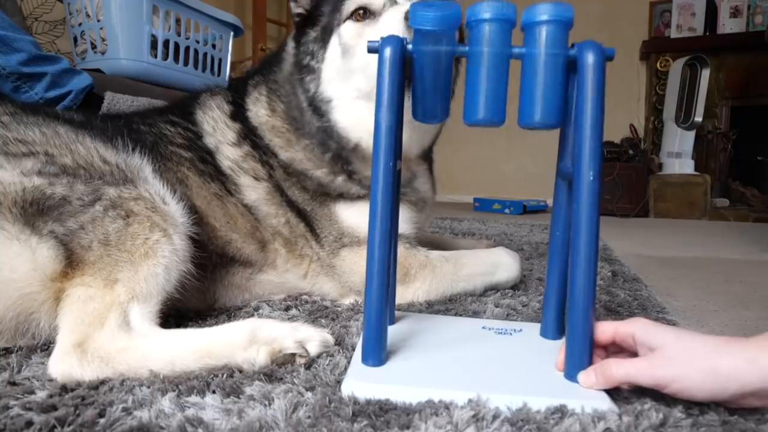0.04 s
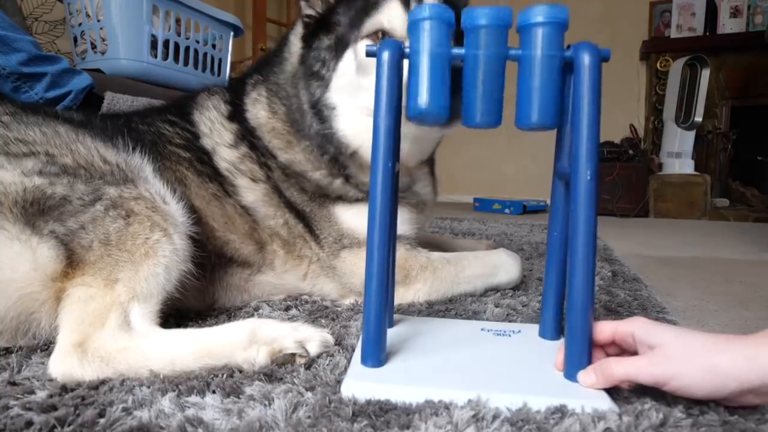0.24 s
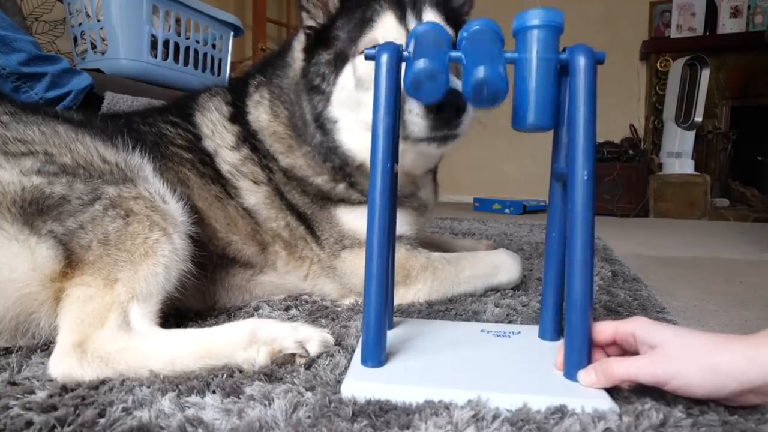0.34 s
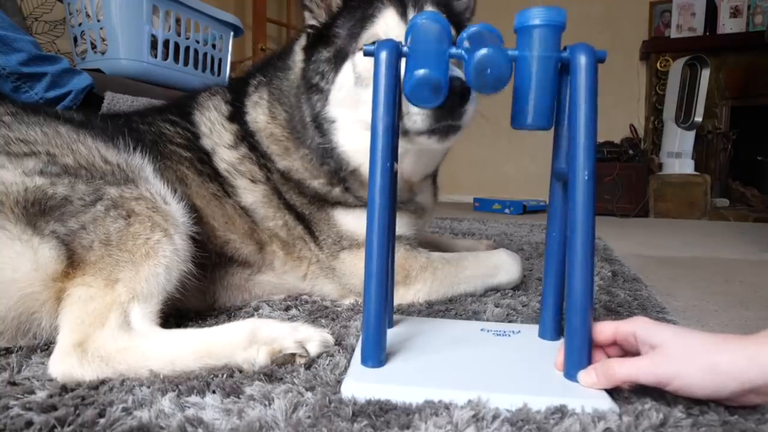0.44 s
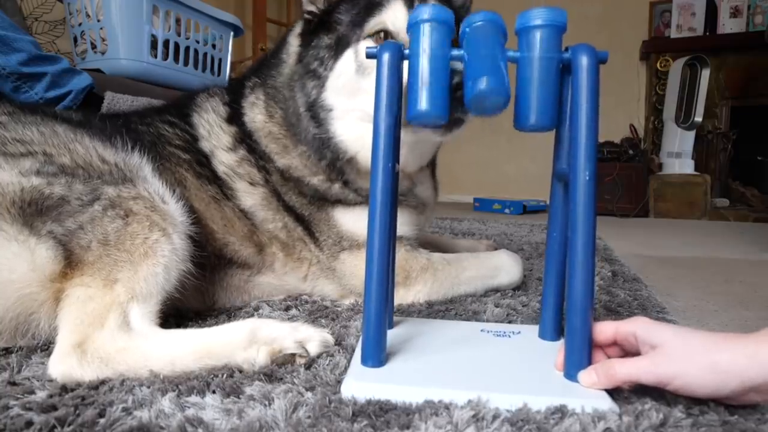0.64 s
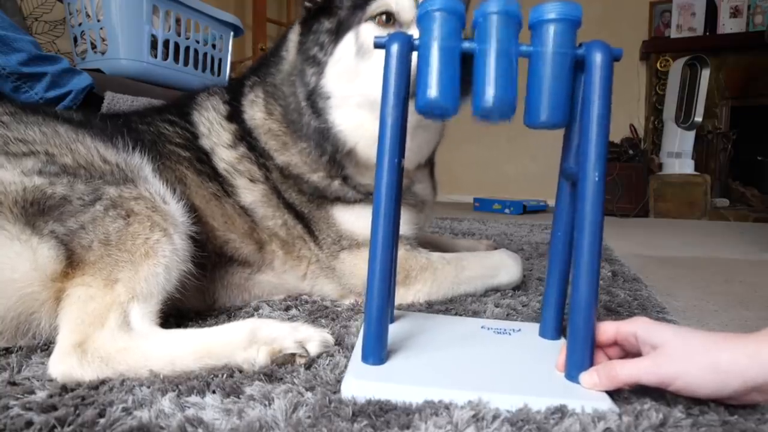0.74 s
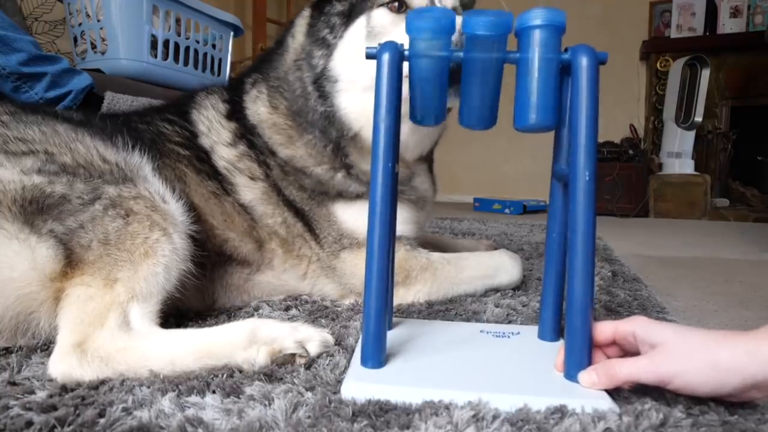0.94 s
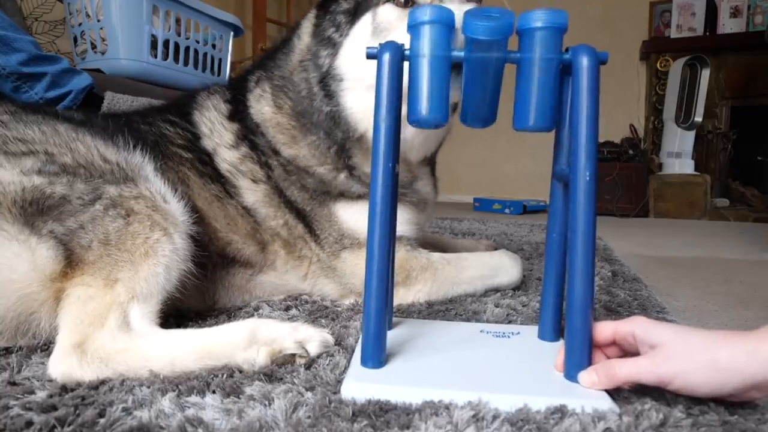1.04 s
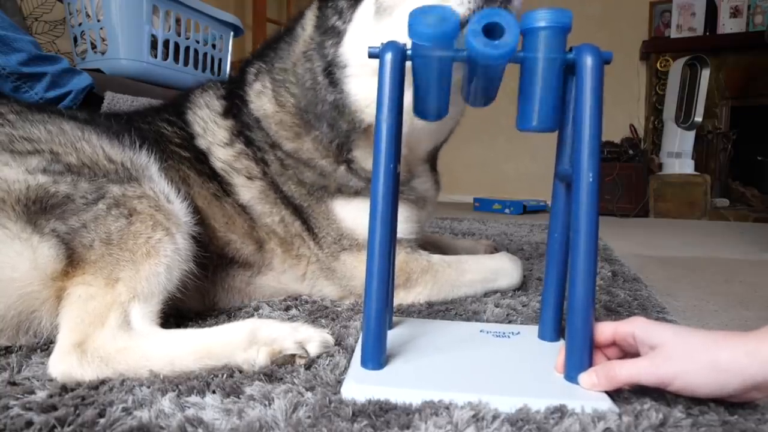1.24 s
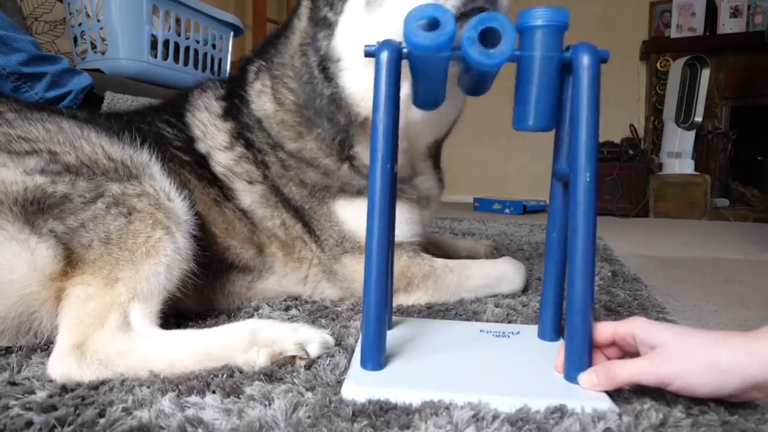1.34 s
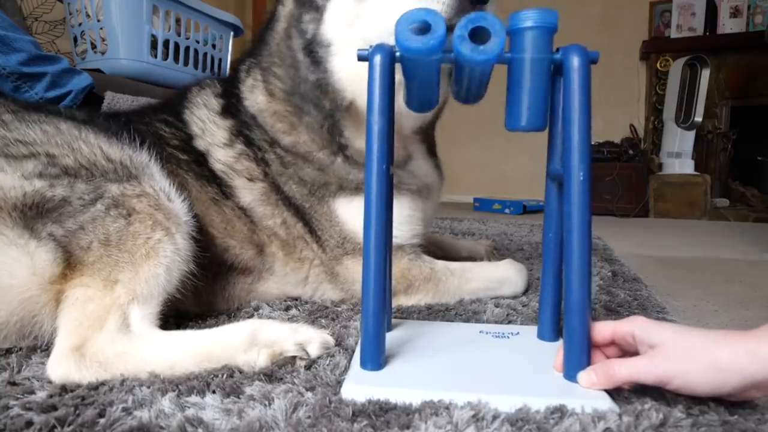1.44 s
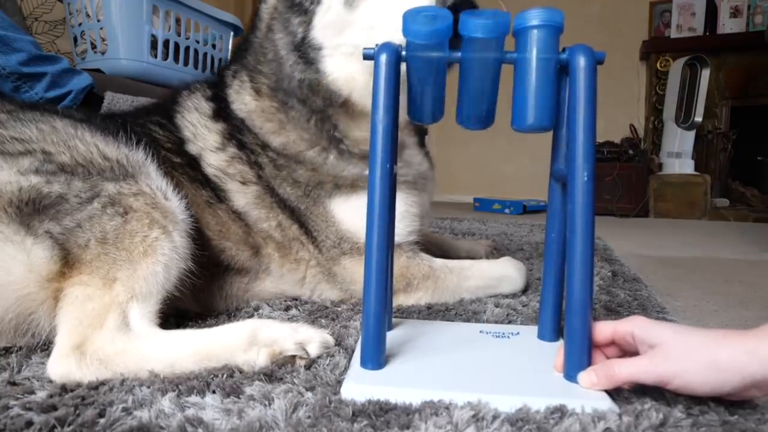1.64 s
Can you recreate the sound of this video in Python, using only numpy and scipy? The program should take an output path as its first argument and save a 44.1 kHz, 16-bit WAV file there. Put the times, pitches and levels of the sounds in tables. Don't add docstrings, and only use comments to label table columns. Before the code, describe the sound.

Hollow plastic cups knock and rattle on a bar, dry treats ticking inside, in a carpeted room

```python
import sys
import numpy as np
from scipy import signal
from scipy.fft import rfft, irfft
from scipy.io import wavfile

SR = 44100
rng = np.random.default_rng(int(sys.argv[2]) if len(sys.argv) > 2 else 0)


def inscribe(sig):
    pcm = np.round(np.clip(np.atleast_2d(sig).T, -1, 1) * 32767)
    wavfile.write(sys.argv[1], SR, pcm.astype(np.int16))


def ratio(d):
    e = np.asarray(d, float) / 20
    return 10 ** e


N = 74970

# start_s, peak_db, pitch_hz
FRAME_THUMPS = [(0.225, -49, 217), (.244, -27.5, 199), (0.306, -36.5, 238), (.345, -32, 475),
                (0.453, -20, 210), (.456, -27, 434), (0.566, -35, 330), (0.675, -32.5, 213),
                (0.736, -26.5, 440), (.858, -25.5, 208), (.8885, -19.5, 510), (.896, -24.5, 442),
                (1.096, -37, 552), (1.264, -30.5, 466), (1.3, -30, 274), (1.302, -35, 430),
                (1.59, -56, 239)]
# time_s, level_db
TURNING = [(0, -46.5), (0.096, -60.5), (0.194, -55), (0.217, -44), (.4, -45.5), (.53, -49.5), (.65, -53.5),
           (.76, -43.5), (.95, -50), (1.05, -51), (1.241, -58.5), (1.298, -46.5), (1.479, -52),
           (1.598, -43.5), (1.7, -49)]
# freq_hz, density_db_per_hz
RUB_SPECTRUM = [(35, -59), (60, -27), (217, 8), (380, -11), (715, 6.5), (1110, 0.5), (5590, -5),
                (10000, -9), (13900, -17), (16000, -56)]
# freq_hz, width_hz, level_db
RUB_RINGS = [(201, 270, -19), (390, 330, -15), (800, 100, -37.5), (2170, 160, -51), (3700, 500, -22),
             (6140, 250, -20)]
# start_s, peak_db, top_band_rel_db
TREAT_TICKS = [(0.059, -35, -4.5), (0.271, -29.5, 1), (0.296, -18, -10), (.348, -16, 0), (0.4358, -27.5, 1),
               (.344, -23, -5), (.457, -34, -13), (.479, -43, -13), (.8125, -37, -14), (.835, -27, -5),
               (0.8716, -23, -5), (.8925, -33, -5), (0.912, -26, -3), (1.29, -42, 1), (.045, -32.5, -8),
               (0.682, -46, -4), (0.443, -26, -4), (0.467, -27, -19), (0.503, -36, -17),
               (0.5683, -12, -3.5), (.562, -28, -3), (0.581, -39, -10), (.586, -29, 0), (.605, -27, -9),
               (.514, -50, -15), (.3277, -40, -6), (0.2663, -36, -9), (.659, -39, -7), (.9737, -32, -6),
               (.748, -21, 1), (0.759, -21, -19), (.864, -21, 0), (0.867, -19.5, 0), (0.876, -20, -16),
               (.9035, -26, -15), (.920, -15, -13), (.961, -25.5, 7.5), (1.066, -34.5, -10),
               (1.264, -41.5, 4), (1.33, -12.5, -2.5), (1.34, -25, 2), (1.353, -16, -0.5),
               (1.363, -28, -19), (1.4072, -17.5, -4.5), (1.419, -29, -12), (1.451, -25.5, -4.5)]
# low_hz, high_hz
TICK_BANDS = [(4600, 8610), (7600, 10060), (11000, 14600)]
# start_s, peak_db
RIM_SNAPS = [(.2055, -20), (.2655, -24), (.2715, -13), (.280, -21), (.288, -21), (.4345, -15), (.537, -32),
             (.659, -15), (.7963, -17), (.8718, -2), (.8739, -7), (.948, -24), (.9737, -21), (1.0685, -20)]
# start_s, peak_db, lower_modes_rel_db
CHATTER = [(0.0247, -27, -3), (0.1725, -66.5, 11), (0.2828, -25, -10), (0.327, -25, -33),
           (0.3798, -28, -27), (0.4679, -24.5, -6), (0.5615, -33, -21), (.5682, -16.5, -38),
           (.580, -32, -22), (.586, -38, -25), (.605, -25, -30), (.617, -42, -20), (0.216, -37.5, 7),
           (.249, -38, -14), (0.7459, -18.5, -29), (0.7545, -21, -24), (0.755, -18.5, -16),
           (0.7414, -33, -15), (0.7724, -25, -9), (0.7972, -31, -21), (0.8314, -28, -9),
           (0.8669, -13.5, -1), (0.8764, -19.5, -21), (0.88, -35, -18), (0.9033, -17, -8.5),
           (0.9103, -25, -6), (0.9159, -21, -4), (0.9224, -17, -12), (0.965, -29.5, -8), (1.019, -45, -13),
           (0.9199, -10.5, -19), (0.9314, -26.5, -2), (0.938, -27, -3), (0.9482, -23, 2.5),
           (0.961, -27.5, -2), (0.985, -38, 1), (1.0102, -34, -23), (1.027, -38, -1), (1.0683, -21.5, -8),
           (1.123, -34.5, -2.5), (1.2734, -30, -6.5), (1.5319, -29.5, -6), (1.5683, -32, 3.5)]
# freq_hz, level_db, t60_s
BAR_UPPER = [(5420, -4, 0.009), (5650, -2, 0.008), (5980, -5, 0.006)]
BAR_LOWER = [(3715, -9.5, 0.029), (3796, -7, 0.016)]
# start_s, peak_db
RIM_CLICKS = [(.194, -58), (0.2052, -18), (0.218, -42), (.234, -22), (0.2655, -20), (0.271, -12.5),
              (.280, -15), (0.288, -22.5), (.297, -16), (.3474, -8.5), (.358, -11.5), (0.4344, -12.5),
              (.3335, -33), (.354, -14.5), (.444, -20.5), (.468, -20), (.7455, -26.5), (.7485, -23),
              (0.7552, -21), (.7588, -21), (.7675, -30), (.773, -23), (1.342, -29), (0.933, -26),
              (0.865, -23), (.059, -31), (.485, -30), (0.536, -31), (0.561, -27.5), (0.659, -25),
              (0.7966, -18.5), (.8128, -25), (0.8349, -18.5), (.8718, -14.5), (0.8732, -20), (0.947, -22.5),
              (0.961, -24.5), (.9737, -23.5), (0.993, -35), (1.0686, -25), (1.3296, -20.5), (1.351, -20.5),
              (1.407, -21.5), (1.599, -24.5)]
# freq_hz, level_db, t60_s
RIM_MODES = [(1582, -13.5, 0.015), (2144, -5.5, 0.0048), (2830, -9, 0.006), (3795, -8, 0.0071),
             (4800, -8, 0.0015), (7240, -19.5, 0.0085)]
# start_s, peak_db, upper_modes_rel_db
TUBE_KNOCKS = [(.024, -54, 13.5), (.074, -43, -7.5), (.205, -31, 13), (.245, -30.5, 6.5), (.334, -26, -1),
               (.344, -18, -1.5), (.3468, -17.5, 4), (.3395, -24.5, -1), (.358, -27.5, 8.5),
               (.429, -29, -9), (.434, -24.5, -1), (.448, -27.5, 4.5), (.584, -28, -6), (.659, -23.5, 1.5),
               (.682, -24, -13), (.721, -29, -2.5), (.737, -30, -5), (.8155, -35.5, 3.5), (.857, -26, -0.5),
               (.8885, -18.5, -10), (.895, -26.5, -5), (1.099, -33.5, -1.5), (1.169, -39, 0.5),
               (1.268, -41, -14), (1.283, -30, -16), (1.302, -19.5, -9), (1.569, -45, 10.5),
               (1.601, -39, 2)]
# freq_hz, level_db, t60_s
TUBE_LOWER = [(1090, -13, .012), (720, -7, .025), (810, -5, .018), (900, -3, .018), (1010, -6, .015),
              (1180, -9, .012)]
TUBE_UPPER = [(1350, -5, .016), (1500, -4, .016), (1880, -6, .016), (2110, -4, .04), (2300, -8, .016)]
# freq_hz, difference_db
LEAN = [(100, -2), (300, 1.2), (700, -3.5), (2500, -2), (9000, 0.1)]

AIR_DB, AIR_CUT_HZ = -60, 10000
RUMBLE_DB, SHAKE_HZ = -34, 20
ROOM_T60_S, ROOM_DB, WALL_CUT_HZ = 0.17, -11, 11000
WIDTH_DB, WIDTH_FROM_HZ, TOP_WIDTH_DB, TOP_WIDTH_HZ = -18, 450, 10, 9900
THUMP_T60_S, THUMP_SOFT_HZ, THUMP_DB = 0.046, 574, -1
RUB_GRAINS_PER_S, RUB_GRAIN_DB, RUB_SMOOTH_DB, RUB_DB = 2500, 3.5, 3, 3
CLUMP_HZ, CLUMP_DB = (140, 25), 2.5
TICK_T60_S, FIZZ_DB = 0.007, -7
SNAP_HZ, SNAP_T60_S, SNAP_DB = 4440, 0.00046, 5
RIM_LOW_HZ, RIM_HIGH_HZ = 790, 6400
KNOCK_CONTACT_S, KNOCK_DB = 0.00324, 1
LAG_S, MODE_SPREAD_DB = 0.0008, 2.5
LOW_CUT_HZ, TOP_CUT_HZ, CUTOFF_HZ = 239, 13040, 16700


def rms_one(x):
    return x / np.sqrt(np.mean(x ** 2) + 1e-20)


def butter(x, order, hz, kind):
    return signal.sosfilt(signal.butter(order, hz, kind, fs=SR, output="sos"), x)


def colour(x, points):
    hz, db = np.transpose(points)
    curve_db = np.interp(np.log(np.fft.rfftfreq(N, 1 / SR) + 1), np.log(hz), db)
    return irfft(rfft(x) * ratio(curve_db), N)


def soften(x, hz):
    r = np.exp(-2 * np.pi * hz / SR)
    return signal.lfilter([(1 - r) ** 2], [1, -2 * r, r * r], x)


def ring(force, hz, t60_s):
    r, w = ratio(-60 / (t60_s * SR)), 2 * np.pi * hz / SR
    return signal.lfilter([0, np.sin(w)], [1, -2 * r * np.cos(w), r * r], force + 1e-18)


def spikes(start_s, peak_db):
    out = np.zeros(N)
    out[((start_s + LAG_S) * SR).astype(int)] = ratio(peak_db)
    return out


def strike(start_s, peak_db, modes, contact_s):
    out = np.zeros(N)
    luck = rng.standard_normal((len(start_s), len(modes), 256))
    age = np.arange(255)
    fade = ratio(-60 * age / SR / contact_s)
    spots = ((start_s[:, None] + LAG_S) * SR).astype(int) + age
    for k, (hz, level_db, t60_s) in enumerate(modes):
        rough = luck[:, k, 1:] * fade
        drive = np.abs(rough @ np.exp(-2j * np.pi * hz * age / SR) + 1e-9)
        rough = rough / drive[:, None]
        gain = ratio(peak_db + level_db + MODE_SPREAD_DB * luck[:, k, 0])
        force = np.zeros(N)
        np.add.at(force, spots, gain[:, None] * rough)
        out += ring(ring(force, hz, t60_s), hz, 3 / hz) * (1 - ratio(-20 * hz / SR)) * 2
    return out


def air():
    return ratio(AIR_DB) * soften(rng.standard_normal((2, N)), AIR_CUT_HZ)


def rumble(toy):
    spectrum = [(20, 5), (50, -5), (90, -1), (160, -13), (400, -44)]  # freq_hz, level_db
    shake = rms_one(colour(rng.standard_normal((2, N)), spectrum))
    return ratio(RUMBLE_DB) * soften(np.abs(toy), SHAKE_HZ) * shake


def room(x):
    age_s = np.arange(SR // 2) / SR
    envelope = ratio(-60 * age_s / ROOM_T60_S) * (1 - np.exp(-age_s / 0.0013))
    tails = soften(rng.standard_normal((2, SR // 2)) * envelope, WALL_CUT_HZ)
    tails = tails / np.sqrt(np.sum(tails ** 2, axis=1, keepdims=True))
    return signal.fftconvolve(x[None], tails, axes=1)[:, :N]


def frame_thumps():
    out = np.zeros(N)
    for start_s, peak_db, pitch_hz in FRAME_THUMPS:
        push = np.zeros(N)
        push[int(start_s * SR)] = ratio(peak_db + THUMP_DB)
        out += ring(push, pitch_hz, THUMP_T60_S) + 0.37 * ring(push, 224, THUMP_T60_S)
    return soften(out, THUMP_SOFT_HZ)


def turning_gain():
    return ratio(np.interp(np.arange(N) / SR, *np.transpose(TURNING)))


def rubbing():
    sizes = ratio(RUB_GRAIN_DB * np.minimum(rng.exponential(1, N), 5)) * rng.choice([-1, 1], N)
    grains = rms_one(sizes * (rng.random(N) < RUB_GRAINS_PER_S / SR))
    grains = grains + ratio(RUB_SMOOTH_DB) * rng.standard_normal(N)
    clumps = sum(rms_one(soften(rng.standard_normal(N), hz)) for hz in CLUMP_HZ)
    grains = grains * ratio(CLUMP_DB * clumps)
    rings = sum(ratio(db) * rms_one(ring(grains, hz, 2.2 / width_hz)) for hz, width_hz, db in RUB_RINGS)
    return ratio(RUB_DB) * turning_gain() * (rms_one(colour(grains, RUB_SPECTRUM)) + rings)


def treat_ticks():
    out = np.zeros(N + SR)
    fade = ratio(-60 * np.arange(2048) / SR / TICK_T60_S)
    for start_s, peak_db, top_db in TREAT_TICKS:
        noise = rng.standard_normal(2048) * fade
        first = int((start_s + LAG_S) * SR)
        levels_db = (peak_db + 2, peak_db + top_db + 0.5, peak_db + top_db + FIZZ_DB)
        for edges_hz, band_db in zip(TICK_BANDS, levels_db):
            crack = butter(noise, 2, edges_hz, "band")
            out[first:first + 2048] += ratio(band_db) * crack / np.abs(crack).max()
    return out[:N]


def rim_snaps():
    return ring(spikes(*np.transpose(RIM_SNAPS)), SNAP_HZ, SNAP_T60_S)


def chatter():
    start_s, peak_db, lower_db = np.transpose(CHATTER)
    upper = strike(start_s, peak_db, BAR_UPPER, contact_s=0.0033)
    lower = strike(start_s, peak_db + lower_db + 1.5, BAR_LOWER, contact_s=0.002945)
    return upper + lower


def rim_clicks():
    start_s, peak_db = np.transpose(RIM_CLICKS)
    rims = strike(start_s, peak_db, RIM_MODES, contact_s=0.0005)
    snaps = spikes(start_s, peak_db + SNAP_DB)
    return butter(rims + snaps, 2, [RIM_LOW_HZ, RIM_HIGH_HZ], "band")


def tube_knocks():
    start_s, peak_db, upper_db = np.transpose(TUBE_KNOCKS)
    lower = strike(start_s, peak_db, TUBE_LOWER, KNOCK_CONTACT_S)
    upper = strike(start_s, peak_db + upper_db - 2, TUBE_UPPER, KNOCK_CONTACT_S)
    return ratio(KNOCK_DB) * (lower + upper)


def scene():
    toy = frame_thumps() + rubbing() + treat_ticks() + rim_snaps() + chatter() + rim_clicks() + tube_knocks()
    mid, side = room(toy) * ratio([[ROOM_DB], [WIDTH_DB]])
    side = side + ratio(TOP_WIDTH_DB) * butter(side, 4, TOP_WIDTH_HZ, "high")
    spacing = 0.07 * (np.roll(toy, -1) - np.roll(toy, 1))
    side = butter(side + spacing, 1, WIDTH_FROM_HZ, "high")
    left_right = []
    for way in (1, -1):
        lean = [(hz, way * db / 2) for hz, db in LEAN]
        left_right.append(colour(toy + mid, lean) + way * side)
    near = butter(np.array(left_right), 2, [LOW_CUT_HZ, TOP_CUT_HZ], "band")
    return near + air() + rumble(toy)


def roll_off(x):
    return signal.sosfilt(signal.butter(12, 16480, fs=SR, output="sos"), x)


def record(dry):
    top_cut = signal.cheby2(10, 60, CUTOFF_HZ, fs=SR, output="sos")
    mix = signal.sosfilt(top_cut, dry)
    return roll_off(mix)


dry = scene()
out = record(dry)
inscribe(out)
```